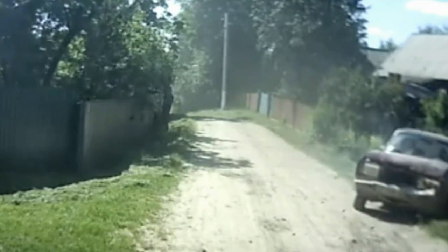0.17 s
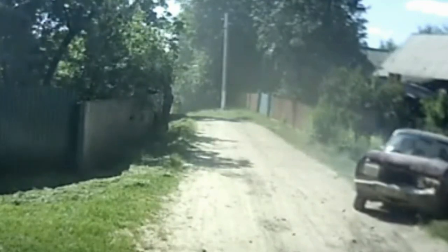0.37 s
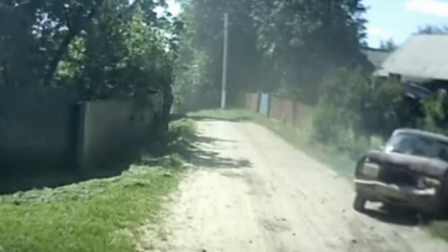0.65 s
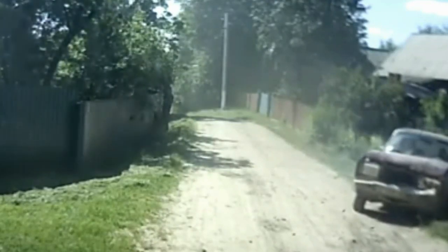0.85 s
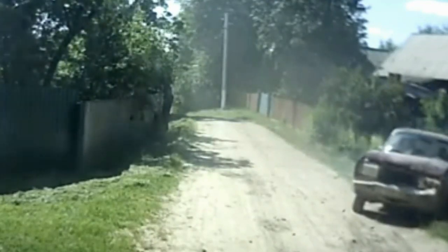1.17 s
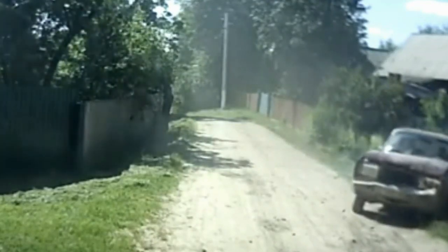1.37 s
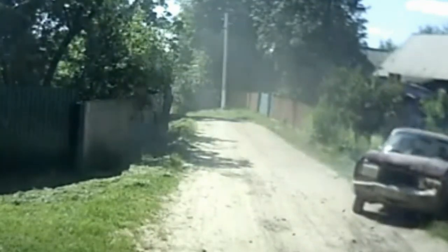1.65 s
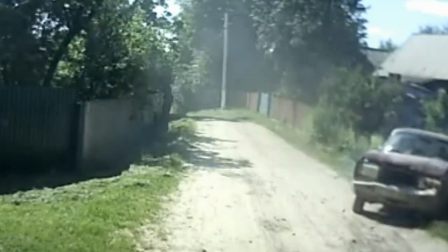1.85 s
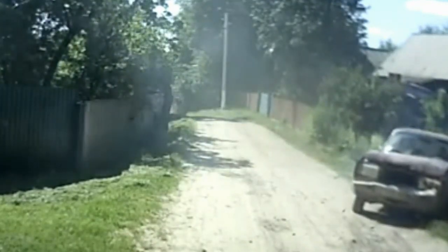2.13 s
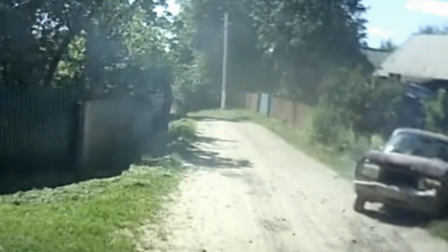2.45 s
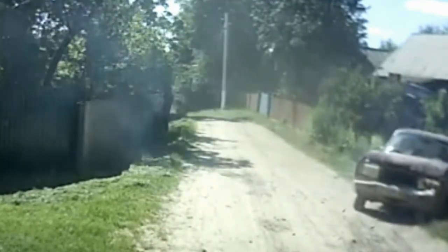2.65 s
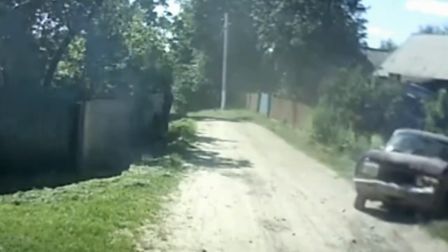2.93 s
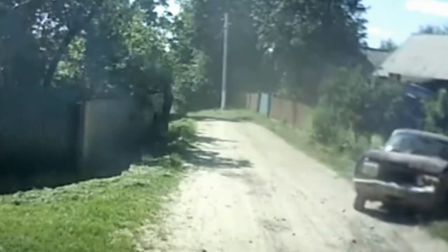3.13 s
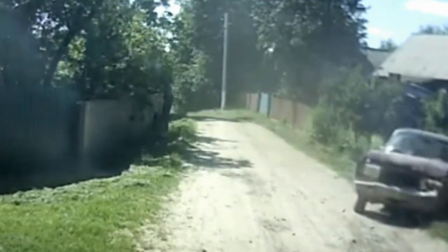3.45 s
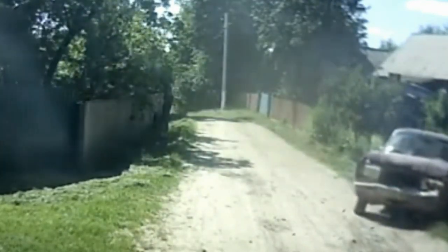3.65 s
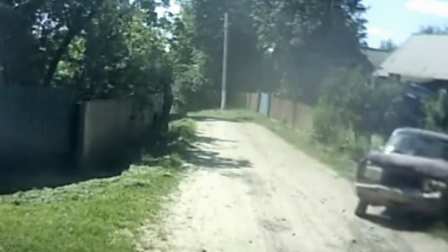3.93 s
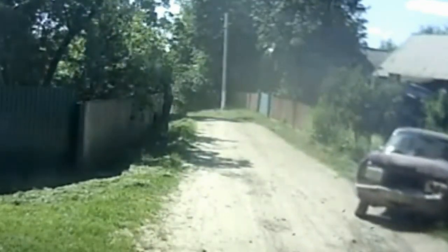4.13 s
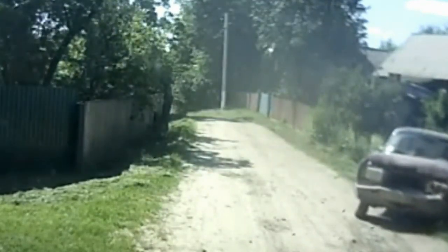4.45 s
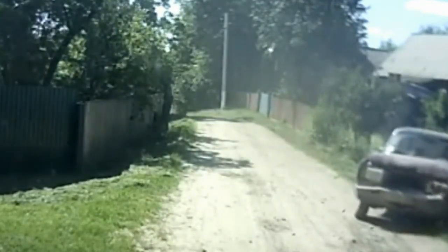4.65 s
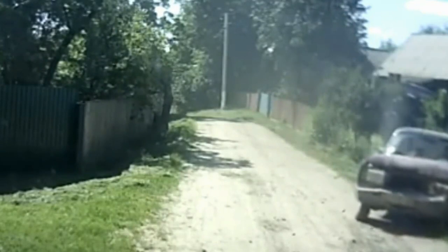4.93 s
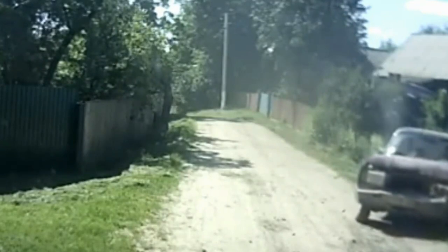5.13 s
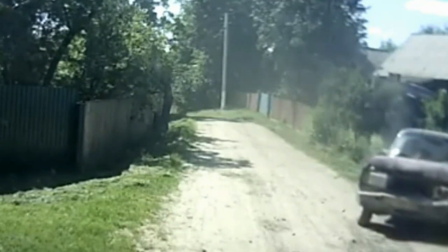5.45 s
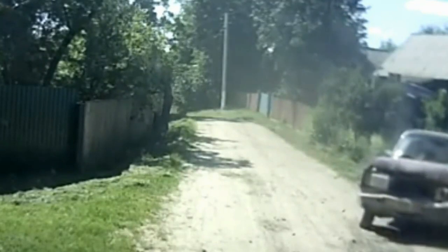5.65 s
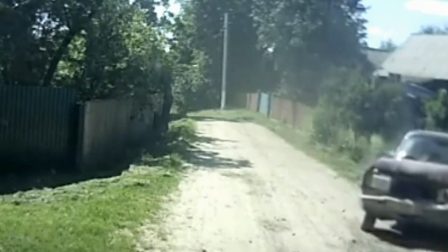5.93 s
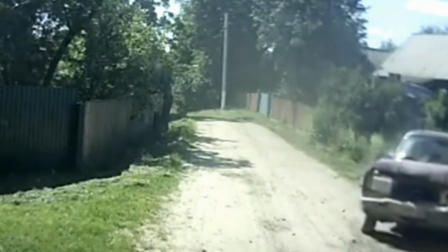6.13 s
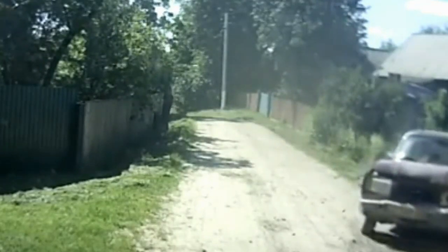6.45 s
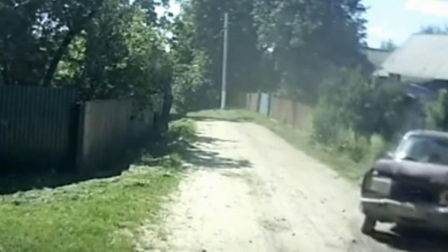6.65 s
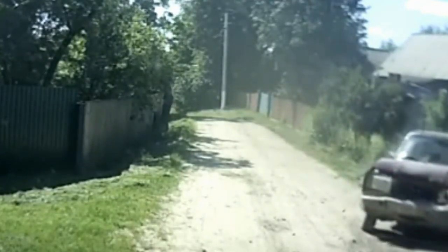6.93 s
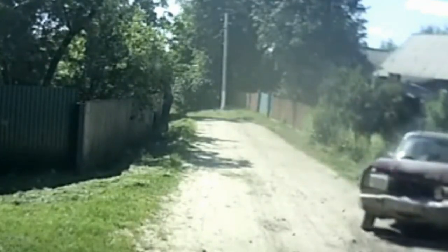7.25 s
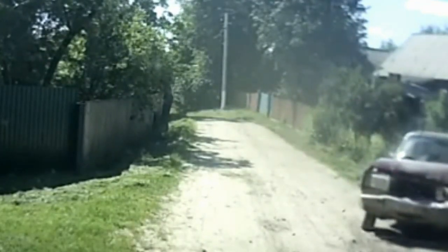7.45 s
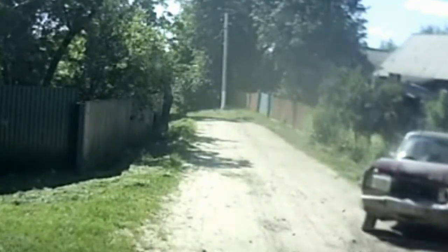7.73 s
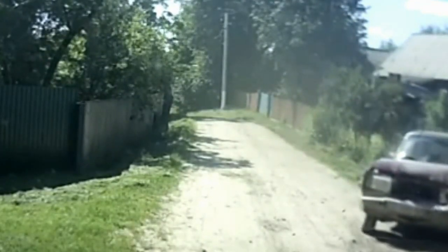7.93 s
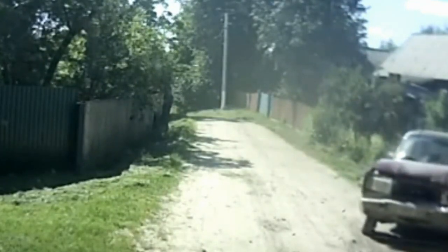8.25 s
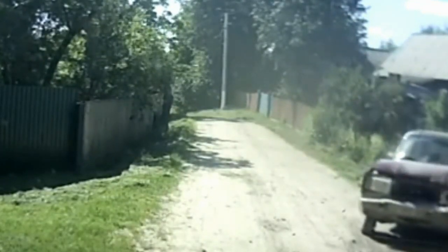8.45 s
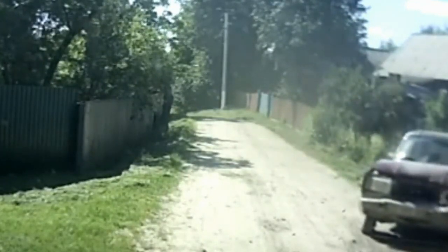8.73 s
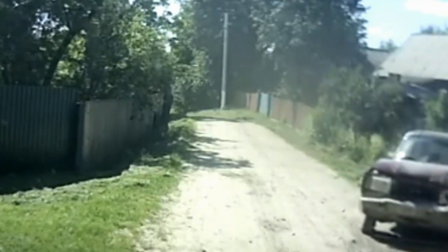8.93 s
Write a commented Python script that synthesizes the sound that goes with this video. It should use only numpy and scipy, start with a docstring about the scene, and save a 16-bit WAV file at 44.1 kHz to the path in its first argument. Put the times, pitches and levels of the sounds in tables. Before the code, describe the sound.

An old four-cylinder car revs hard and eases off repeatedly on a village lane, raspy and booming, with wind buffeting and one heavy overloaded thump.

```python
"""The edge of a village lane: an old four-cylinder car is revved hard, a few metres from the microphone.
The firing note booms in the exhaust with clear overtones; uneven cylinders add a rasp of crank and cam orders.
Gas noise roars through the same pipe, the fan hisses, low hums come and go and loose sheet metal rattles.
Fences and houses scatter echoes; wind buffets the microphone and its strongest thump overloads the input."""
import sys
import numpy as np
from scipy import signal
from scipy.fft import rfft, irfft, next_fast_len
from scipy.io import wavfile
from scipy.ndimage import uniform_filter1d

SR = 44100
rng = np.random.default_rng(int(sys.argv[2]) if len(sys.argv) > 2 else 0)


def persist_wave(psi):
    """Save psi, clipped to +-1, as 16-bit WAV."""
    counts = np.round(np.clip(psi, -1, 1) * 32767).astype(np.int16)
    wavfile.write(sys.argv[1], SR, np.atleast_2d(counts).T)


N = 400417
T = np.arange(N) / SR  # time [s]
STEP = 32  # samples between slow control values


def undb(db):
    """Decibels to gain."""
    return 10 ** (np.asarray(db) / 20)


def unit(x):
    """Scale to rms 1."""
    return x / np.sqrt(np.mean(np.abs(x) ** 2))


def curves(table):
    """Columns of a table, one value per sample."""
    s, *columns = np.transpose(table)
    return [np.interp(T, s, column) for column in columns]


def walk(rate, size=N, sr=SR):
    """Random levels held 1 / rate s and slewed twice; spread 1."""
    hold = int(sr / rate)
    steps = np.repeat(rng.standard_normal(size // hold + 1), hold)
    return unit(uniform_filter1d(uniform_filter1d(steps, hold), hold)[:size])


def gate(start, end, edge_s):
    """0 outside and 1 inside a stretch of time, with straight edges centred on its ends."""
    return np.clip(np.minimum(T - start, end - T) / edge_s + .5, 0, 1)


def noise(colour, body=np.ones_like):
    """Noise of rms 1 with a (Hz, dB) spectrum, heard through a body."""
    size = next_fast_len(N)
    bins = np.arange(size // 2 + 1) * SR / size
    hz, db = np.transpose(colour)
    gain = undb(np.interp(np.log(bins + 1), np.log(hz), db, left=-90, right=-90))
    spectrum = rfft(rng.standard_normal(size)) * gain * body(bins)
    return unit(irfft(spectrum, size)[:N])


def lane(x, wet_db, t60):
    """Scattered echoes from fences and houses; sliding lines beat against their own late copies."""
    chance = rng.random((24, 2))
    lag_s = .008 + .16 * chance[:, 0]
    echo_gain = np.sign(chance[:, 1] - .5) * np.exp(-np.log(1000) * lag_s / t60)
    late = sum(gain * np.roll(x, int(s * SR)) for s, gain in zip(lag_s, echo_gain))
    return unit(x + undb(wet_db) * unit(late))


# engine speed: (time [s], firing rate [Hz])
SPEED = [(0, 128), (0.17, 131), (0.27, 146), (0.41, 146.5), (0.62, 161), (0.81, 172.7), (1.04, 182.5),
         (1.4, 193), (1.8, 202.3), (1.9, 203), (2.19, 175.6), (2.44, 157), (2.52, 163), (2.79, 203.5),
         (2.87, 206), (3.05, 169), (3.2, 146), (3.31, 144.3), (3.7, 142), (4.04, 148.7), (4.36, 147.2),
         (4.66, 144.8), (4.93, 145.3), (5.03, 143.9), (5.57, 149), (5.76, 148.3), (5.88, 156), (6.1, 176.8),
         (6.2, 189), (6.32, 197.5), (6.46, 202.5), (6.63, 187.5), (6.75, 191), (6.9, 205.5), (6.97, 200),
         (7.13, 162.5), (7.25, 160.4), (7.61, 154.7), (8.17, 153.7), (8.4, 163.5), (8.69, 172),
         (8.89, 176.2), (8.99, 181.8), (9.08, 180)]


def firing_rate():
    """The revs rise and fall smoothly, as a heavy crank does."""
    return uniform_filter1d(curves(SPEED)[0], 1800, mode="nearest")


# how hard the engine pulls: (time [s], level above the steady pull [dB])
LOAD = [(0, -16), (.45, -3), (.64, 2.5), (1.0, -0.5), (1.8, -3), (2.05, -10), (2.42, -15.5), (2.62, -4),
        (2.95, 1), (3.12, 0), (3.4, -2.5), (4.7, -1.5), (5.75, -1.5), (5.9, -1), (6.2, 1), (6.9, -1.5),
        (7.1, 2.5), (7.5, 0), (8.06, 5.5), (8.35, 3.5), (8.55, 0.5), (8.72, 5.5), (8.91, 2.5),
        (9.08, -13.5)]


def pull():
    """The load on the engine sets the strength of the boom and, less, of the roar."""
    return curves(LOAD)[0]


# the exhaust's answer to the firing note, strongest where it resonates: (firing rate [Hz], level [dB])
BOOM = [(125, -12), (145, -17), (156, -14.5), (166, -17.5), (176, -20), (186, -21), (194, -32.5),
        (206, -35)]
# the boom drops out for a moment: (start [s], end [s], depth [dB])
DROPOUTS = [(0.02, 0.07, 14), (0.118, 0.185, 10), (.255, 0.29, 6), (0.775, 0.86, 6), (2.706, 2.74, 5),
            (3.576, 3.707, 13), (4.04, 4.176, 12.5), (5.925, 5.963, 6), (6.02, 6.06, 6),
            (6.146, 6.28, 10.5), (6.51, 6.63, 14), (6.994, 7.01, 0), (8.928, 8.97, 12)]


def boom(hz, firings, load_db):
    """A sine at the firing rate, weighted by the exhaust's resonance and the pull."""
    gap_db = sum(depth_db * gate(start, end, 0.028) for start, end, depth_db in DROPOUTS)
    level_db = np.interp(hz, *np.transpose(BOOM)) + load_db - gap_db
    return undb(level_db + 0.97 * walk(25)) * np.sin(2 * np.pi * firings)


# orders that ring clear: (multiple of the firing rate), and for each its relative (level [dB])
ORDERS_CLEAR = (2, 2.5, 3, 3.5, 4, 4.5, 5, 5.5, 6)
ORDER_DB = [4, -2.5, 2.5, -1.5, 1, -5, -2.5, -7, -5.5]
# the exhaust's answer to the overtones of the boom: (frequency [Hz], level [dB])
OVERTONE_COLOUR = [(255, -46), (284, -51), (293, -42), (340, -43), (370, -45.5), (405, -41), (440, -40),
                   (475, -44), (510, -39), (550, -48), (585, -46), (615, -42), (650, -40), (730, -42),
                   (775, -44), (815, -40), (855, -37), (885, -37), (910, -45), (970, -39.5), (1050, -39),
                   (1250, -42.5)]
# level of the overtones: (time [s], second order [dB], higher firing orders [dB], crank orders [dB])
OVERTONES = [(0.0, -2.6, -8.6, -7.4), (0.5, -3.5, 1.4, -0.4), (1.0, 7.8, 3.7, 1.2), (1.9, 3.5, 5.1, 0.5),
             (2.3, -1.9, -4.3, -4.5), (2.8, 3.5, 0.8, -1.3), (3.4, -5.2, -0.4, -0.7), (4.2, 2.1, -3.9, 0.4),
             (5.6, 2.1, -1.2, -0.3), (6.3, -2.0, 0.4, 0.1), (6.7, -3.1, -1.6, 2.2), (7.15, 2.1, 2.9, -2.9),
             (7.9, -1.5, -0.8, 3.6), (8.7, 1.6, 1.5, -2.6), (9.08, 0.6, -1.7, -2.0)]
# one overtone rings out for a while: (start [s], end [s], multiple of the firing rate, rise [dB])
RINGING = [(.3, .95, 3, 4), (1.2, 1.75, 5, 2), (7.05, 7.45, 4, 4), (8.55, 8.92, 5, 6)]


def overtones(hz, firings, unrest):
    """Whole and half multiples of the firing rate, coloured by the exhaust and echoed by the lane."""
    total = 0
    second_db, higher_db, crank_db = curves(OVERTONES)
    for order, order_db in zip(ORDERS_CLEAR, ORDER_DB):
        if order % 1:
            family_db = crank_db
        else:
            family_db = second_db if order == 2 else higher_db
        level_db = order_db + np.interp(order * hz, *np.transpose(OVERTONE_COLOUR)) + family_db
        level_db = level_db + sum(rise_db * gate(start, end, .12)
                                  for start, end, which, rise_db in RINGING if which == order)
        flutter_db = (1.8 + 2 * unrest) * walk(20) + 1.8 * walk(4) - unrest
        phase = 2 * np.pi * (order * firings + rng.random())
        total = total + undb(level_db + flutter_db) * np.sin(phase)
    return np.std(total) * lane(unit(total), -11, .4)


# exhaust and body resonances: (frequency [Hz], width [Hz], level [dB])
PIPE = [(370, 110, -6.5), (507, 117, -0.5), (700, 54, 6.5), (839.4, 77, 8.5), (1011, 76, 1.5),
        (1120, 46, 3), (1281, 230, 5.5), (1474, 165, -0.5), (1714, 31, 0), (1835, 23, 2), (2040, 180, -6),
        (2700, 8000, -32)]


def pipe(hz):
    """Complex response of the exhaust; neighbouring resonances cancel in the gaps between them."""
    return sum(undb(db) / (1 + 2j * (hz - f) / width) for f, width, db in PIPE)


def rasp(hz, firings, wander_db, flicker_db, crank_db, cam_db, high_db):
    """The four firings of a cam turn differ, so lines stand at every quarter of the firing rate and ring the pipe."""
    out, slow_hz = 0, hz[::STEP]
    for quarter in range(5, 98):
        order = quarter / 4
        if order in ORDERS_CLEAR or (quarter % 2 and order > 13):
            continue
        # small timing errors tell more in the high orders, so the cam lines catch up there
        lower_cam_db = cam_db + 0.86 * min(order, 8)
        upper_cam_db = cam_db + 0.92 * min(order, 8)
        db = [high_db, lower_cam_db, crank_db, upper_cam_db][quarter % 4]
        db = db + wander_db * walk(2.98, len(slow_hz), SR / STEP)
        db = db + flicker_db * walk(16, len(slow_hz), SR / STEP)
        line_hz = order * slow_hz
        gain = pipe(line_hz) * undb(db - .2 * order) / (1 + (line_hz / 3600) ** 10)
        phase = 2 * np.pi * (order * firings + rng.random()) + np.repeat(np.angle(gain), STEP)[:N]
        out = out + np.repeat(np.abs(gain), STEP)[:N] * np.sin(phase)
    return unit(out)


# spectrum of the gas noise before the pipe: (frequency [Hz], relative level per Hz [dB])
ROAR_COLOUR = [(130, -27), (220, -9), (400, -4), (900, -6), (1500, -9), (2300, -6.5), (2930, 1), (3470, -2),
               (4160, -13), (5000, -28.5), (6500, -62)]


def gas_noise(firings):
    """Turbulent gas through the pipe, throbbing with the firings."""
    throb = 1 + 0.21 * np.sin(2 * np.pi * firings)
    return noise(ROAR_COLOUR, pipe) * throb * undb(1.05 * walk(7))


def roar(hz, firings, unrest, load_db):
    """Rasp and gas noise together, louder with speed and pull; the treble share grows with speed."""
    lines = rasp(hz, firings, wander_db=2.2, flicker_db=2.8, crank_db=1.0, cam_db=-11.0, high_db=0.0)
    lines = lane(lines, -9, .4)
    line_part = undb(-4.5 - unrest + .02 * (hz - 170)) * lines
    gas_part = undb(-6.0 + unrest) * gas_noise(firings)
    upper = line_part + gas_part
    dull = signal.sosfiltfilt(signal.butter(2, 1800, fs=SR, output="sos"), upper)
    treble = undb(0.0096 * (hz - 179.5)) * (upper - dull)
    level_db = -28 + 0.0692 * (hz - 170)  # growth in dB per Hz of firing rate
    level_db = level_db + 0.22 * uniform_filter1d(load_db, 9000)  # dB per dB of load
    return undb(level_db) * (dull + treble)


# spectrum of the fan's hiss: (frequency [Hz], relative level per Hz [dB])
FAN_COLOUR = [(3800, -12.5), (5000, -3.5), (6700, 1), (7600, -9), (10000, -14)]


def fan(hz):
    """Air hiss of the fan, which grows with engine speed."""
    level_db = -64 + 0.1358 * (hz - 170.5)  # growth in dB per Hz of firing rate
    return undb(level_db + 1.5 * walk(6)) * noise(FAN_COLOUR)


def engine():
    """Clean boom and overtones, the rasp of uneven cylinders, throbbing gas noise and the fan's hiss."""
    hz, load_db = firing_rate(), pull()
    firings = np.cumsum(hz) / SR
    # burns come unevenly while the throttle moves: 0 at steady speed, 1 in a fast slide
    slide = np.abs(np.gradient(hz)) * SR  # Hz per s
    unrest = np.clip(uniform_filter1d(slide / 90, 6000), 0, 1)
    uneven_firings = firings + (.0015 + .004 * unrest) * walk(45)
    tones = boom(hz, firings, load_db) + overtones(hz, uneven_firings, unrest)
    return np.sqrt(2) * tones + fan(hz) + roar(hz, uneven_firings, unrest, load_db)


# low hums that come and go: (start [s], end [s], start pitch [Hz], end pitch [Hz], level [dB])
HUMS = [(0, .22, 232, 253, -35.5), (1.047, 1.923, 49, 56.1, -32.5), (1.15, 1.972, 108.9, 112.7, -37),
        (1.2, 1.85, 93, 103, -46), (1.983, 2.933, 83, 83, -37), (3.95, 4.3, 84, 82, -38),
        (7.755, 8.738, 35.05, 43.2, -31), (7.9, 8.6, 74, 82, -38.5), (6.5, 7.048, 100.2, 100, -36)]


def hums():
    """Low sine tones that swell in, fade out and waver in level; most slide a little in pitch."""
    out = 0
    for start, end, start_hz, end_hz, db in HUMS:
        fade = np.clip(np.minimum(T - start, end - T) / 0.055, 0, 1)
        cycles = np.cumsum(np.interp(T, [start, end], [start_hz, end_hz])) / SR
        out = out + np.sqrt(2) * fade * undb(db + 2.4 * walk(6.5)) * np.sin(2 * np.pi * cycles)
    return out


# gusts on the microphone: (time [s], level [dB])
WIND = [(0, -41), (.45, -29), (1.4, -39), (2.0, -31.5), (2.3, -38.5), (3.0, -32.5), (4.2, -37), (4.6, -33),
        (5.6, -34.5), (6.4, -35), (7.15, -34), (7.7, -24), (8.8, -34.5), (9.08, -25)]
# spectrum of the turbulence: (frequency [Hz], relative level per Hz [dB])
WIND_COLOUR = [(15, -16), (35, -1.5), (60, -9), (110, -9), (200, -16), (400, -43.5)]
# wind thumps: (time [s], level of the main swing [dB], pitch [Hz], hold [s])
THUMPS = [(0.295, -20.5, 40, 0.097), (1.117, -24, 59.7, 0.032), (2.048, -29, 46, .07),
          (2.428, -24, 56, 0.034), (3.102, -27, 50, 0.079), (3.578, -24, 50, .05),
          (5.937, -26, 39.5, 0.079), (6.486, -27.5, 59.4, 0.063), (7.079, -23.5, 51, 0.18),
          (7.531, -4, 42.7, 0.053), (7.617, -8.5, 38.5, 0.025), (7.733, -20, 34.6, .06),
          (8.976, -26, 42, 0.058)]


def wind():
    """Low turbulence in gusts on the microphone, with hard thumps that hold briefly and then collapse."""
    out = undb(curves(WIND)[0] + 2.16 * walk(13)) * noise(WIND_COLOUR)
    for s, db, hz, hold_s in THUMPS:
        t = np.maximum(T - s, 0)
        flap = np.sin(2 * np.pi * hz * t) + 0.45 * np.sin(2 * np.pi * 1.9 * hz * t)
        out = out + undb(db) * flap / (1 + (t / hold_s) ** 3)
    return out


# rattles of loose sheet metal: (time [s], level [dB], brightness [Hz])
KNOCKS = [(5.945, -31, 600), (7.53, -18, 700), (7.548, -19.5, 450), (7.772, -25, 500), (8.316, -22.5, 7000),
          (8.331, -21, 4000)]
# resonances of the panel: (frequency [Hz], relative level per Hz [dB])
PANEL = [(200, -33), (380, 6), (550, -8), (750, 3.5), (1700, -7.5), (3000, -17), (4200, -38), (5500, -24.5),
         (7000, -45)]


def knocks():
    """Short rattles of a body panel: bursts of noise in its resonances, each with its own treble limit."""
    out = 0
    for s, db, top_hz in KNOCKS:
        t = np.maximum(T - s, 0) / 0.0049  # the burst peaks 4.9 ms after the blow
        burst = noise(PANEL, lambda hz: 1 / (1 + (hz / top_hz) ** 4))
        out = out + undb(db) * t * np.exp(1 - t) * burst
    return out


def scene():
    """Engine, hums, wind and panel."""
    return (engine() + hums() + wind() + knocks())[None]


# spectrum of the input's hiss: (frequency [Hz], relative level per Hz [dB])
HISS = [(2470, -26), (4200, -1.5), (4630, -4.5), (6700, -5), (7600, -6), (13700, -11), (14600, -16),
        (15400, -18.5)]


def record(dry):
    """The microphone input rounds off the loudest swings, adds its own hiss and cuts the top."""
    clip, hiss_db, top_hz = .67, -55.5, 15500  # full scale = 1, dB, Hz
    rounded = dry / (1 + (dry / clip) ** 4) ** .25
    wet = rounded + undb(hiss_db) * noise(HISS)
    return signal.sosfilt(signal.ellip(10, .2, 70, top_hz, fs=SR, output="sos"), wet)


dry = scene()
out = record(dry)
persist_wave(out)
```